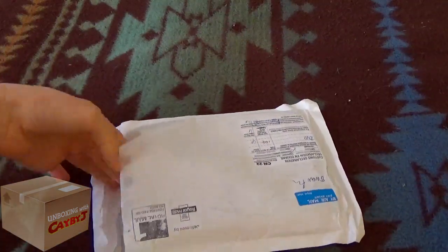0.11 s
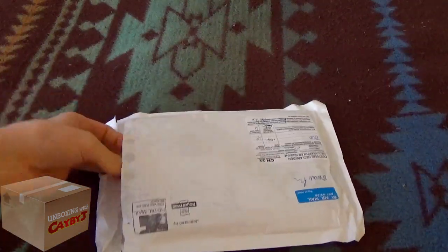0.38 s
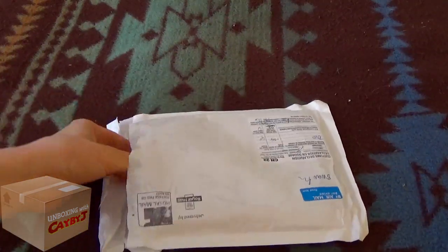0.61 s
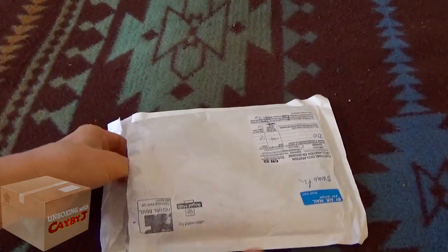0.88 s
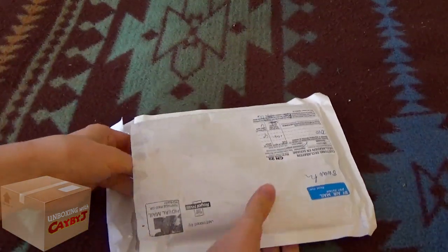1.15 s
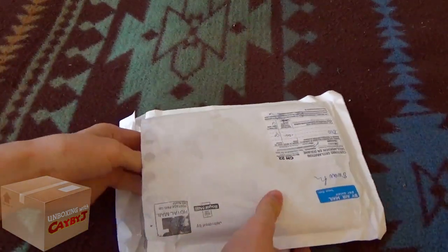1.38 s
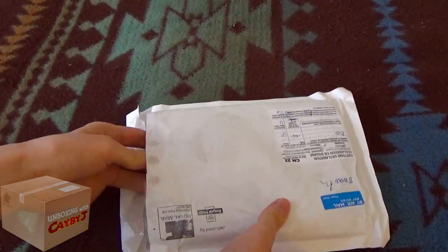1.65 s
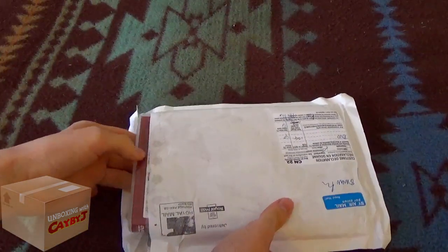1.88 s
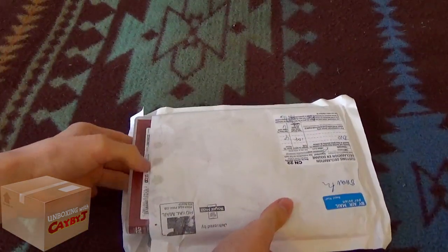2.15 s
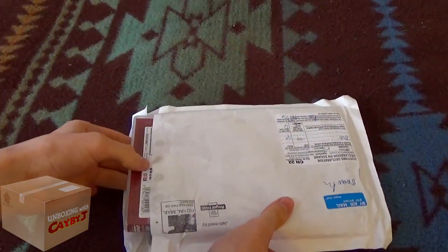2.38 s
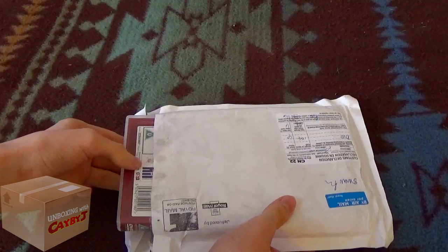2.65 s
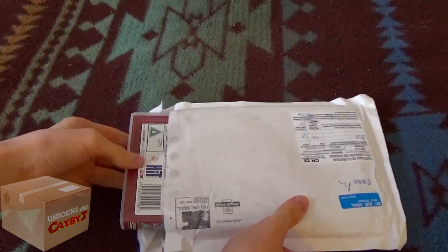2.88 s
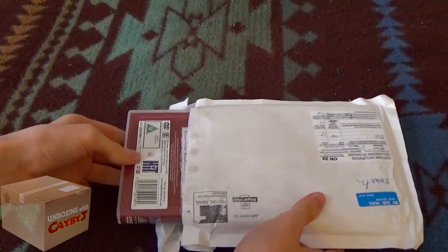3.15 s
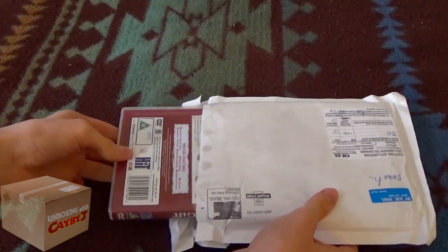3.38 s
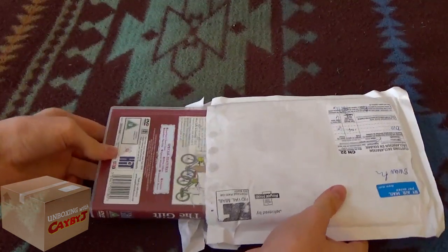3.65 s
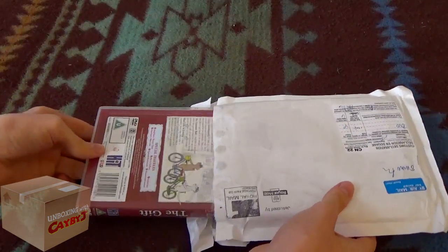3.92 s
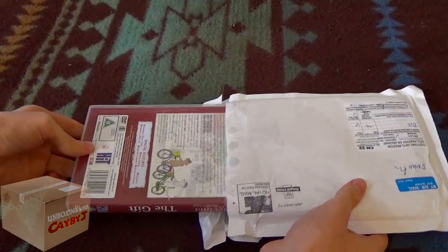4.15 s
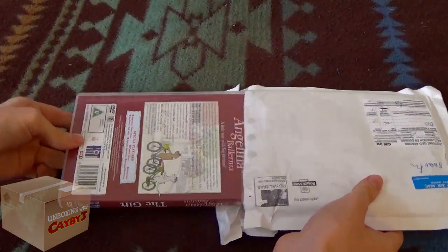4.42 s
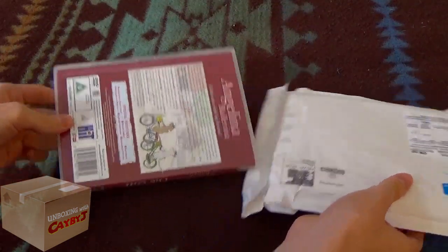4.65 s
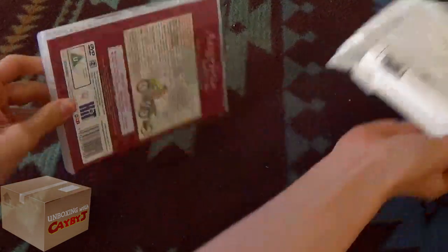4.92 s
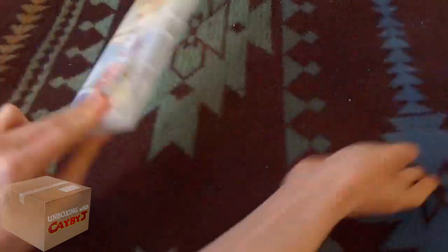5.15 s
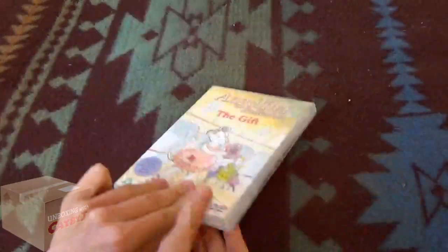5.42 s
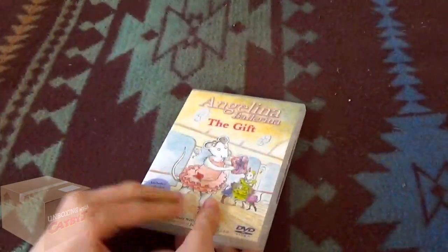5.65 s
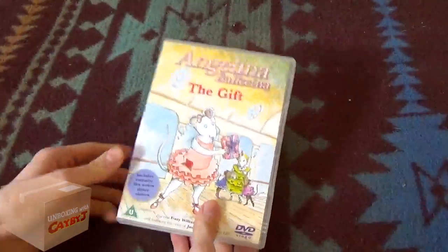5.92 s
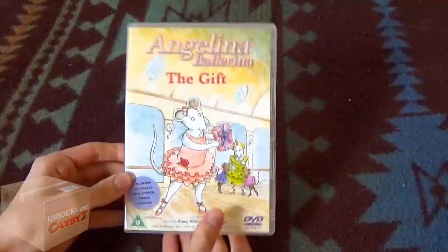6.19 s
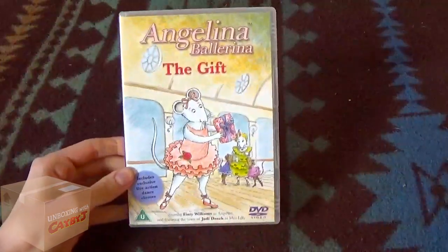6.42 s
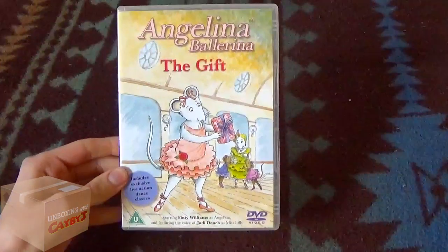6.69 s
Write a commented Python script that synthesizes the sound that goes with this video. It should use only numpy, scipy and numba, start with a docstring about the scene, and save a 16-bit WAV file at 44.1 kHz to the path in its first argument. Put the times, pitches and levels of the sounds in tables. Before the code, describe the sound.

Hands crinkle a padded paper envelope up close, a plastic case slides out with a papery scrape, then soft knocks and faint finger brushes.

```python
"""In a small carpeted room, hands crinkle a padded paper envelope close to a small stereo microphone.
They slide a plastic disc case out and turn it over. Paper and rubbing are shaped noise full of tiny crackles,
creases are short ringing bursts, and knocks are dull bursts that ring the tones of the hollow case.
The room answers with fading noise. Beneath lie a quiet floor of noise, a faint whine and a low motor hum,
both made of sine waves."""
import sys
import numpy as np
from scipy import signal
from scipy.fft import rfft, irfft
from scipy.io import wavfile
from scipy.ndimage import uniform_filter1d
from numba import njit

SR = 44100
rng = np.random.default_rng(int(sys.argv[2]) if len(sys.argv) > 2 else 0)


def master_out(mix):
    """Clip the mix to full scale and print it as 16-bit PCM to the path in sys.argv[1]."""
    frames = np.transpose(np.atleast_2d(mix))
    ceiling = np.clip(frames, -1, 1)
    pcm = np.round(ceiling * 32767).astype(np.int16)
    wavfile.write(sys.argv[1], SR, pcm)


def linear_from_db(decibels):
    """Turn decibels (scalar or array-like) into linear amplitude factors; 0 gives 1."""
    return 10 ** (np.asarray(decibels, float) / 20)


N = 299875
T = np.arange(N) / SR  # time of every sample, s

# creases that snap: (time [s], peak before placing left or right [dB], ring [Hz], treble over ring [dB])
CREASE_SNAPS = [(0.0193, -25, 2070, 14), (0.1134, -6.5, 3650, -5.5), (0.1805, -22.5, 3080, -24),
                (0.2035, -23.5, 2410, 17), (0.213, -27, 1760, -14), (0.2246, -23.5, 2100, -10),
                (0.2432, -24.5, 3350, 20), (0.3759, -20, 5770, 10), (0.3832, -23.5, 4280, 3),
                (0.4409, -21.5, 2850, -9), (0.4835, -23.5, 2290, -6), (0.5166, -28, 3030, 4),
                (0.561, -28, 3170, 13), (0.5906, -16, 2170, 14), (0.5939, -17.5, 2210, 2.5),
                (0.603, -16.5, 2270, 4.5), (0.6717, -32.5, 5900, -1), (0.7636, -34, 2420, 9),
                (1.0345, -21.5, 4300, -1), (1.1487, -32, 2740, -8), (1.2228, -30.5, 2370, -12),
                (1.27, -10.5, 4540, -8.5), (1.2724, -15, 2860, -17), (1.2859, -20, 2360, -8),
                (1.3578, -9.5, 2850, -23), (1.428, -21, 3400, -28), (1.4341, -24, 2160, -30),
                (1.4395, -26, 3160, -14), (1.536, -31, 2030, -22), (1.6212, -25.5, 2010, -7),
                (1.6686, -24.5, 3900, 11), (1.6883, -27, 1740, 19), (1.736, -31, 3660, 14),
                (1.7671, -29, 4010, 17), (1.8591, -26, 5610, 14), (1.9049, -25, 2850, 11.5),
                (1.9587, -28.5, 1830, 6), (1.9651, -16, 5620, 15), (1.9685, -30, 5600, 12),
                (2.1128, -40.5, 6000, 13), (2.1412, -40, 4350, -6), (2.1704, -33.5, 3940, -1),
                (2.2036, -26, 2640, 2), (2.2513, -39, 4060, 4), (2.271, -37, 3280, 0),
                (2.3383, -35, 3630, 11), (2.7633, -23, 4400, 7), (2.7716, -21, 5260, 6.5),
                (2.8618, -33, 4540, 14), (2.8687, -27, 3120, 14), (2.9783, -25.5, 2930, 5),
                (2.995, -29, 2080, 9), (3.3339, -28.5, 2640, -12), (3.5115, -30, 2620, 3),
                (3.6527, -30.5, 3540, -12), (3.726, -32, 3760, -10), (4.141, -36, 2900, -3),
                (4.2544, -33, 5230, -21), (4.2867, -33, 4180, -14), (4.299, -26, 4740, -26),
                (4.35, -29.5, 3730, -11), (4.4326, -37, 6000, 1), (4.454, -26, 6200, 1),
                (4.4653, -25.5, 3530, -1), (4.482, -23, 2880, 9), (4.573, -22.5, 3860, 3),
                (4.5835, -18, 5450, 3), (4.6144, -23.5, 3130, -10), (4.7016, -27.5, 5900, -5),
                (4.7282, -23, 5300, 5), (4.8714, -8.5, 2780, -13.5), (4.8756, -19.5, 4120, -20),
                (4.89, -26, 4230, -13), (4.8966, -27, 4170, -19), (4.916, -25, 3480, -24),
                (4.9857, -23.5, 2240, -37), (5.048, -36.5, 1750, -7), (5.1788, -41, 2290, -7),
                (5.2226, -37.5, 1670, -1), (5.2541, -37.5, 2810, -5), (5.3595, -37.5, 1530, -7),
                (5.6333, -37, 1600, 17), (5.6432, -27, 6160, 5), (5.9765, -46.5, 6000, 10),
                (6.0011, -42, 6000, 10), (6.113, -43, 2060, -3)]
# dull knocks of case and padding: (time [s], peak before placing left or right [dB], ring [Hz])
DULL_KNOCKS = [(0.1143, -32.5, 400), (0.23, -34, 1060), (0.2505, -34.5, 1070), (0.3559, -36, 450),
               (0.603, -35.5, 390), (1.2691, -33, 396), (1.2893, -34, 1400), (1.3574, -37, 1400),
               (1.4013, -35.5, 780), (1.6204, -35, 1430), (3.333, -38, 920), (3.5645, -27, 750),
               (3.5857, -36, 840), (4.4788, -38.5, 950), (4.6128, -29.5, 760), (4.837, -35, 820),
               (4.8706, -33.5, 840), (4.985, -24, 960), (5.0088, -31, 1380), (5.145, -33.5, 665),
               (5.2236, -37, 786), (5.2574, -39, 650), (5.3565, -43, 284), (5.497, -46.5, 188),
               (6.1125, -33, 690), (6.117, -31.5, 192), (6.129, -32, 670), (6.1386, -35.5, 420),
               (6.1625, -41, 404), (2.7675, -43, 870)]


def unit(x):
    """Scale a sound to an average strength (rms) of 1."""
    return x / np.sqrt(np.mean(x ** 2))


def colour(x, points):
    """Filter a sound by a spectrum given as (frequency [Hz], level [dB])."""
    hz, db = np.transpose(points)
    size = x.shape[-1]
    bin_hz = np.arange(size // 2 + 1) * SR / size
    gain_db = np.interp(np.log(bin_hz + 1), np.log(hz), db)
    return irfft(rfft(x) * linear_from_db(gain_db), size)


def band(x, lo_hz, hi_hz):
    """Keep the pitches between two edges."""
    edges = [lo_hz, min(hi_hz, SR / 2.2)]
    return signal.sosfilt(signal.butter(2, edges, "band", fs=SR, output="sos"), x)


@njit
def moving_resonance(x, hz, width):
    """A resonance whose pitch moves: two linked stores pass energy back and forth, with some loss."""
    y, b, l = np.empty(len(x)), 0., 0.
    for i in range(len(x)):
        g = np.tan(np.pi * hz[i] / SR)
        v = (b + g * (x[i] - l)) / (1 + g * (g + width))
        b, l, y[i] = 2 * v - b, l + 2 * g * v, width * v
    return y


def walk(rate):
    """A wandering control: random levels, `rate` new ones a second, joined by ramps, with rms near 1."""
    hold = int(SR / rate)
    steps = np.repeat(rng.standard_normal(N // hold + 1), hold)
    return unit(uniform_filter1d(steps, hold)[:N])


def pan(x, left_over_right_db):
    """Place a sound between left and right by loudness alone."""
    return x * linear_from_db(np.array([[left_over_right_db / 2], [-left_over_right_db / 2]]))


def wide(x, pan_db, side_db):
    """A broad source: left and right also get a scrambled copy in opposite sign."""
    scramble = rng.standard_normal(256) * linear_from_db(-40 * np.arange(256) / 256)
    side = signal.fftconvolve(x, scramble / np.sqrt(np.sum(scramble ** 2)))[:N]
    return pan(x, pan_db) + linear_from_db(side_db) * side * np.array([[1], [-1]])


def crackle(rate, spread_db, t60_s, grain):
    """Tiny folds give at random moments, a few much louder; each is a short puff of noise over fibre hiss."""
    chance, size = rng.random(N), rng.exponential(size=N)
    kicks = (chance < rate / SR) * linear_from_db(spread_db * np.minimum(size, 4))
    puffs = unit(signal.lfilter([1], [1, -linear_from_db(-60 / (t60_s * SR))], kicks))
    return np.sqrt(grain * puffs ** 2 + 1 - grain) * rng.standard_normal(N)


def tails(events, db, t60_s):
    """Power that jumps at each event and dies away, falling 60 dB in t60_s."""
    kicks = np.zeros(N)
    for s, peak_db, *_ in events:
        kicks[int(s * SR)] += linear_from_db(peak_db + db) ** 2
    return signal.lfilter([1], [1, -linear_from_db(-60 / (t60_s * SR)) ** 2], kicks)


def add(out, s, sound, peak_db):
    """Mix in one event, louder on the side where the hands work."""
    # where the hands work: (time [s], left over right [dB])
    hand_place = [(0, 2.5), (1, 1.5), (1.3, 3), (2, 2), (4.2, 2), (4.9, -2), (5.3, 1.5), (6.8, 2)]
    start = int(s * SR)
    sound = sound * linear_from_db(peak_db) / np.abs(sound).max()
    part = pan(sound, np.interp(s, *np.transpose(hand_place)))[:, :N - start]
    out[:, start:start + part.shape[1]] += part


def floor_noise():
    """Room rumble and microphone hiss: steady noise whose two channels share more at some pitches."""
    # spectrum of the floor: (frequency [Hz], relative level per Hz [dB])
    floor_colour = [(15, -33), (30, -5.5), (48, -14), (82, -4.5), (140, -12.5), (300, -10), (500, -14),
                    (1200, -21.5), (3000, -29), (10500, -32.5)]
    # how unlike left and right are: (frequency [Hz], side over middle [dB])
    floor_spread = [(40, -22), (190, -16.5), (630, -3), (1500, 2.5), (4000, -0.5), (11000, -9)]
    mid, side = unit(colour(rng.standard_normal((2, N)), floor_colour))
    stereo = mid + colour(side, floor_spread) * np.array([[1], [-1]])
    return linear_from_db(-62 + 0.45 * walk(3.07)) * stereo


def faint_whine():
    """Thin steady tones that waver in pitch and strength, then weaken late."""
    # tones of the whine: (frequency [Hz], rms before wavering and fading [dB])
    whine_tones = [(1007, -72.5), (2019, -90)]
    waver, drift = linear_from_db(1.5 * walk(10)), 0.6 * walk(10)
    # the square root of 2 turns an rms level into the height of a sine
    tones = sum(linear_from_db(db) * np.sqrt(2) * np.sin(2 * np.pi * hz * T + drift) for hz, db in whine_tones)
    fade_db = np.interp(T, [5.6, 6.2], [-0.5, -5])
    return tones * waver * linear_from_db(fade_db)


def motor_hum():
    """A far motor: a low tone and its multiples, each wavering in strength, swelling at the end."""
    # strength of the hum: (time [s], level [dB])
    hum_level = [(0, -77), (6.25, -77), (6.45, -65), (6.8, -65.5)]
    # strength of the base tone and its multiples before wavering: (relative level [dB])
    multiples_db = [0, -5, -9, -11]
    turn = 2 * np.pi * 102 * T + 0.5 * walk(9)  # base tone 102 Hz, wandering a little
    hum = sum(linear_from_db(db + 1.5 * walk(15)) * np.sin((k + 1) * turn) for k, db in enumerate(multiples_db))
    return unit(hum) * linear_from_db(np.interp(T, *np.transpose(hum_level)))


def rustle():
    """Crackle in the sheet, its crisp edge, the mouth of the envelope and the padding."""
    # how hard the hands work the paper: (time [s], level [dB])
    effort = [(0, -48), (.23, -44.5), (.35, -56.5), (.38, -40), (.41, -49), (.46, -43.5), (.63, -45.5),
              (.74, -51), (.9, -52), (1.01, -44.5), (1.12, -52), (1.43, -46.5), (1.52, -52.5),
              (1.65, -46.5), (1.83, -55.5), (2.19, -65.5), (2.34, -58.5), (2.58, -63), (2.75, -70),
              (2.8, -59), (2.98, -53), (3.03, -55.5), (3.35, -53.5), (3.48, -54), (3.6, -51), (3.92, -55.5),
              (4.2, -54), (4.275, -54.5), (4.295, -44.5), (4.325, -53), (4.35, -47), (4.39, -53.5),
              (4.44, -45.5), (4.55, -53.5), (4.71, -47), (4.95, -49), (5.08, -60.5), (5.3, -63.5),
              (5.5, -66.5), (6.1, -68), (6.8, -72)]
    # colour of the rustle: (time [s], treble against middle [dB], bass against middle [dB])
    tint = [(0, 1.5, -10), (.2, -1.5, -7), (.6, 2.5, -10), (1.05, 4.5, -6), (1.4, -1, -4.5),
            (1.7, 2.5, -6.5), (2.3, 1, -3), (3.2, 6, -7), (3.5, 0, -8.5), (3.8, -1.5, -6), (4.33, -2.5, -9),
            (4.42, 6.5, -10.5), (4.7, 0.5, -7.5), (5, -10.5, -1.5), (5.3, -2, 9), (5.7, -2, 4),
            (6.8, -2.5, 3.5)]
    # how the paper is worked: (time [s], grain from 0 smooth rubbing to 1 crumpling)
    paper_grain = [(0, 0.58), (1.9, 0.52), (2.9, 0.39), (3.05, 0.28), (4.2, 0.62), (4.5, 0.49), (6.8, 0.31)]
    # spectrum of the sheet: (frequency [Hz], relative level per Hz [dB])
    sheet_colour = [(760, -29), (1300, -2), (1590, 5.5), (1780, 6.5), (3120, 4.5), (5130, 2.5), (6600, -4),
                    (8580, -42), (14500, -120)]
    # spectrum of the crisp edge: (frequency [Hz], relative level per Hz [dB])
    edge_colour = [(4500, -50), (6300, -4.5), (7200, -0.5), (8700, 4), (11200, -1)]
    # spectrum of the padding: (frequency [Hz], relative level per Hz [dB])
    padding_colour = [(71, -33), (120, 4), (400, 4), (553, 4), (972, 2.5), (1140, 3), (1600, -13),
                      (2080, -13), (3520, -120)]

    # after a snap the sheet keeps rustling, after a knock the padding
    work = linear_from_db(np.interp(T, *np.transpose(effort))) ** 2
    settle = tails(CREASE_SNAPS, -29.5, 0.12)
    shake = tails(DULL_KNOCKS, -24, 0.33)
    s, treble_db, bass_db = np.transpose(tint)
    sheet_level = np.sqrt(work + settle)
    edge_level = np.sqrt(work + settle * linear_from_db(-1) ** 2) * linear_from_db(np.interp(T, s, treble_db))
    padding_level = np.sqrt(work * linear_from_db(np.interp(T, s, bass_db)) ** 2 + shake)

    grain = np.clip(np.interp(T, *np.transpose(paper_grain)), 0, 0.95)
    swell = linear_from_db(4.7 * grain * walk(40))
    folds = swell * crackle(350, 3.6, 0.015, grain)
    fine = swell * crackle(510, 5.2, 0.0033, grain)

    # the shape of the bag sets both the pitch of its creases and that of its mouth
    snap_s, _, snap_hz, _ = np.transpose(CREASE_SNAPS)
    mouth_hz = np.clip(np.interp(T, snap_s, snap_hz), 1700, 5200)
    # the open end is a short cavity: it lifts one band
    mouth = unit(moving_resonance(folds, mouth_hz, 0.5))
    sheet = unit(unit(colour(folds, sheet_colour)) + 0.26 * mouth)
    edge = unit(colour(folds + 1.2 * fine, edge_colour))
    padding = unit(colour(crackle(110, 3.6, 0.016, 0.5 * grain), padding_colour))
    return (wide(sheet * sheet_level, 0.54, -10) + wide(edge * edge_level, -0.74, -11)
            + wide(padding * padding_level, 2.5, -9))


def room(x):
    """The room's answer: fading noise, different left and right, its treble dying first."""
    # how long the room rings: (band centre [Hz], time to fall 60 dB [s])
    room_decay = [(150, 0.24), (600, 0.31), (2500, 0.19), (8000, 0.13)]
    t = T[:SR // 2]
    tail = 0
    for hz, t60 in room_decay:
        noise = band(rng.standard_normal((2, len(t))), hz / 2, hz * 2)
        tail = tail + noise / np.sqrt(hz) * linear_from_db(-60 * t / t60)
    tail = tail * np.clip((t - 0.002) / 0.0014, 0, 1)  # silent for the first 2 ms
    tail = colour(tail, [(100, -22.0), (10000, 7.0)])
    tail = tail / np.sqrt(np.sum(tail ** 2, axis=1, keepdims=True))
    return signal.fftconvolve(x.mean(0)[None], tail, axes=1)[:, :N]


def snaps():
    """A crease buckles at once; the sheet rings round one pitch, spits treble, and settles in smaller cracks."""
    out, t = np.zeros((2, N)), T[:2048]
    chance = rng.standard_normal((len(CREASE_SNAPS), 3, 2048))
    crack = np.minimum(t[:512] / 0.00044, 1) * linear_from_db(-60 * t[:512] / 0.0083)
    for (s, db, hz, treble_db), noise in zip(CREASE_SNAPS, chance):
        # rare random moments start smaller cracks of random strength
        starts = (noise[2] > 2.6) * linear_from_db(-24.5 - 60 * t / 0.1 + 4.0 * noise[2, ::-1])
        starts[0] = 1
        burst = noise[:2] * np.convolve(starts, crack)[:2048]
        ring = unit(band(burst[0], hz / 1.316, hz * 1.195)) + 0.62 * unit(band(burst[0], 1600, 5200))
        treble = unit(band(burst[1], 8000, 13050))
        add(out, s, unit(ring) + linear_from_db(treble_db) * treble, db)
    return out


def knocks():
    """A soft blow: a broad thud plus the tones of the hollow case, shaken unevenly each time."""
    # tones of the case: (frequency [Hz], level [dB], time to fall 60 dB before the limit below [s])
    case_tones = [(200, -10, 0.043), (403, -12, 0.21), (665, -7.5, 0.41), (831, -5, 0.22),
                  (974, -15.5, 0.22)]
    out, t = np.zeros((2, N)), T[:8192]
    hz, tone_db, tone_t60 = np.transpose(case_tones)[:, :, None]
    tone_t60 = np.minimum(tone_t60, 0.12)
    chance = rng.standard_normal((len(DULL_KNOCKS), 8192))
    for (s, db, ring_hz), noise in zip(DULL_KNOCKS, chance):
        t60 = 0.031 * (ring_hz / 800) ** -0.49  # s; higher knocks die sooner
        burst = noise * np.minimum(t / 0.00041, 1) * linear_from_db(-60 * t / max(t60, 0.005))
        thud = unit(band(burst, ring_hz / 1.76, ring_hz * 1.49)) + 0.16 * unit(band(burst, 220, 2300))
        # tones near the thud's pitch are struck hardest: 5 dB less per octave away
        near_db = -5.0 * np.abs(np.log2(hz / ring_hz))
        tones = linear_from_db(tone_db + near_db - 60 * t / tone_t60) * np.sin(2 * np.pi * hz * t)
        case = unit(signal.fftconvolve(burst, np.sum(tones, axis=0))[:8192])
        add(out, s, band(thud + 0.31 * case, 170, 5500), db)
    return out


def slide():
    """Smooth friction, coloured by two air-gap resonances that move as the case comes free."""
    # the case slides out, ringing the gap between case and paper:
    # (time [s], level [dB], lower resonance [Hz], upper resonance [Hz])
    slide_path = [(2.85, -74, 2400, 4830), (3.1, -57.5, 2340, 4530), (3.3, -62, 2450, 4500),
                  (3.5, -59, 2560, 4830), (3.65, -57, 3380, 5200), (3.85, -55.5, 3400, 5700),
                  (4.05, -53.5, 3400, 5730), (4.25, -54.5, 4000, 6000), (4.35, -58, 3630, 6200),
                  (4.44, -47, 3800, 6500), (4.55, -78, 3800, 6500)]
    s, *columns = np.transpose(slide_path)
    db, low_hz, high_hz = (np.interp(T, s, c) for c in columns)
    upper_db = np.interp(T, [3.3, 3.7, 4.3, 4.45], [8.0, -11, -9, 5])  # upper over lower resonance
    rub = crackle(250, 3.5, 0.015, 0.45) * linear_from_db(2.5 * walk(30))
    lower = unit(moving_resonance(rub, low_hz, 0.2))
    upper = unit(moving_resonance(rub, high_hz, 0.2))
    sliding = (T > s[0]) * (T < s[-1])
    return wide((lower + linear_from_db(upper_db) * upper) * linear_from_db(db) * sliding, 0.8, -30)


def brushes():
    """Skin on smooth plastic: a broad, slightly gritty hiss; each stroke has attack, hold and release."""
    # fingers brush over the case as it turns:
    # (time [s], length before release [s], level [dB], treble against it [dB])
    strokes = [(5.089, 0.03, -51.5, -4.5), (5.17, 0.014, -60, -4), (5.24, 0.015, -60, -2),
               (5.327, 0.14, -63.5, 2.5), (5.526, .06, -66, 1), (5.61, 0.075, -62, 0.5),
               (5.816, 0.075, -64.5, -2.5), (5.997, 0.039, -68.5, 0), (6.136, 0.064, -67.5, 5.5),
               (6.29, 0.12, -70.5, 4)]
    # spectrum of skin on plastic: (frequency [Hz], relative level per Hz [dB])
    skin_colour = [(700, -32), (1500, 3), (3000, 2), (5000, 1.5), (7000, -18), (12000, -7)]
    attack_s, release_db_per_s = 0.012, 250
    low, high = np.zeros(N), np.zeros(N)
    for s, length, db, treble_db in strokes:
        rise = np.clip((T - s) / attack_s, 0, 1)
        stroke = rise * linear_from_db(db - release_db_per_s * np.clip(T - s - length, 0, 1))
        low += stroke
        high += stroke * linear_from_db(treble_db)
    grit = crackle(220, 3.3, 0.008, 0.31)
    hiss, treble = unit(colour(grit, skin_colour)), unit(band(grit, 5900, 10300))
    return wide(low * hiss + high * treble, 0.9, -10.5)


def scene():
    """The near sounds, the room's answer to them, and the quiet background."""
    near = rustle() + snaps() + knocks() + slide() + brushes()
    background = floor_noise() + faint_whine() + motor_hum()
    return near + linear_from_db(-14) * room(near) + background


def band_limit(x):
    """A steep low-pass at the top of the band."""
    return signal.sosfilt(signal.butter(12, 12340, fs=SR, output="sos"), x)


def record(dry):
    """A steep filter cuts off the top above 11100 Hz."""
    low_pass = signal.ellip(10, 0.3, 60, 11100, fs=SR, output="sos")
    mix = signal.sosfilt(low_pass, dry)
    return band_limit(mix)


dry = scene()
out = record(dry)
master_out(out)
```